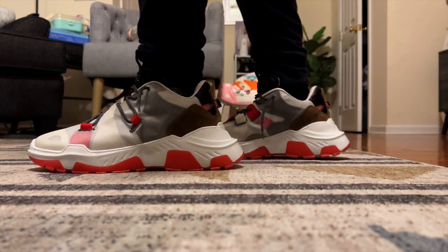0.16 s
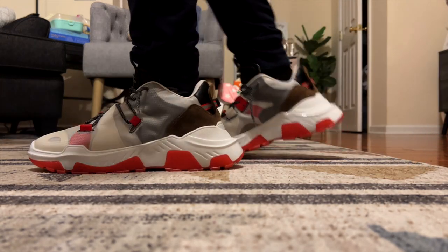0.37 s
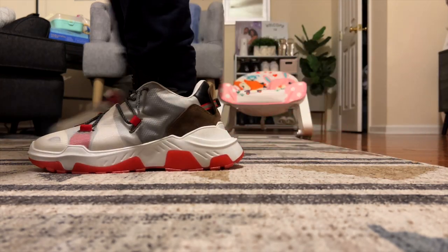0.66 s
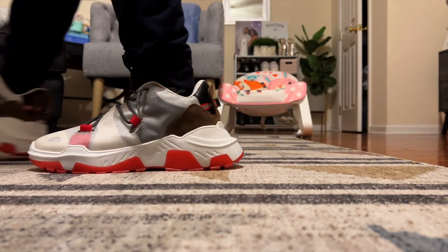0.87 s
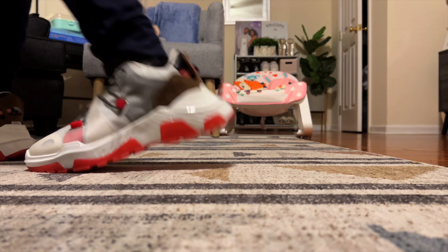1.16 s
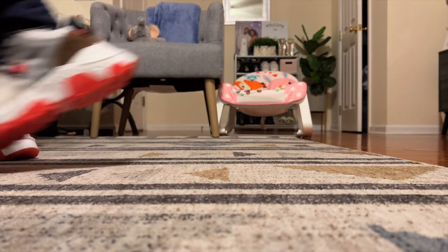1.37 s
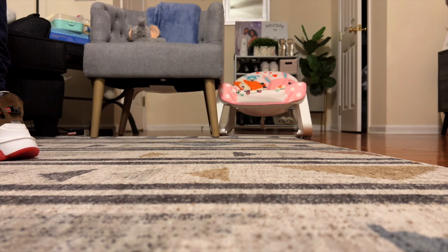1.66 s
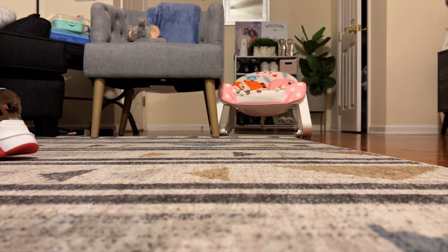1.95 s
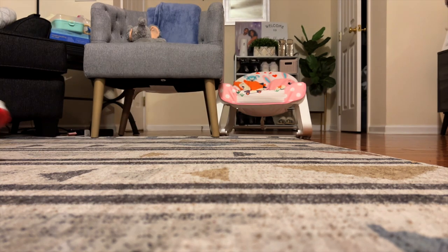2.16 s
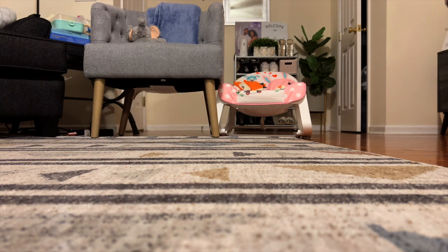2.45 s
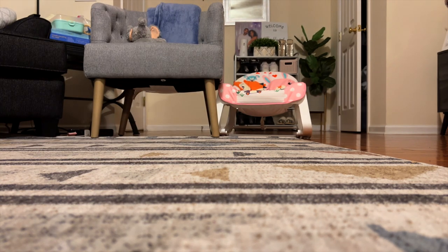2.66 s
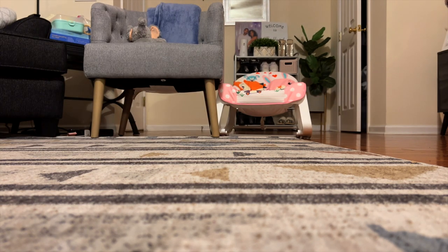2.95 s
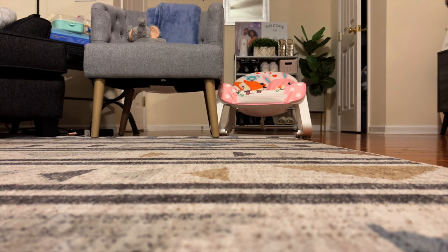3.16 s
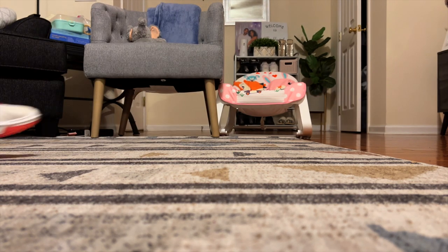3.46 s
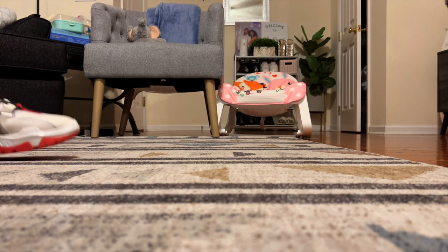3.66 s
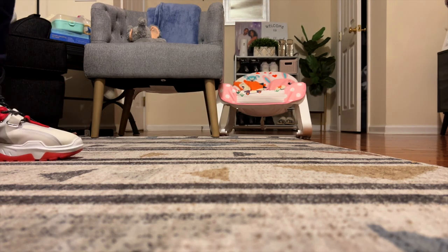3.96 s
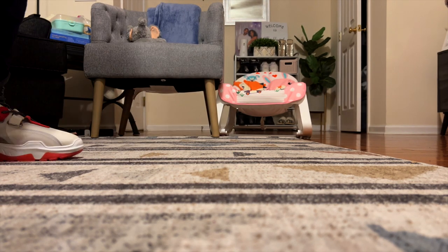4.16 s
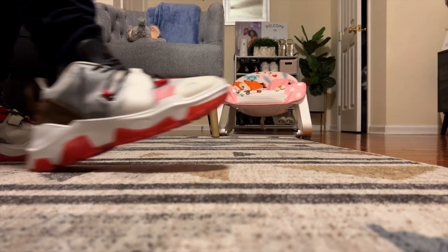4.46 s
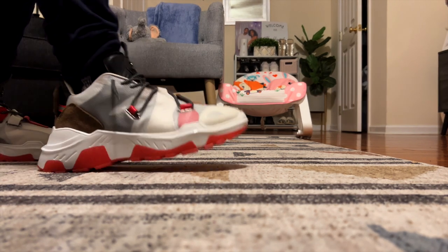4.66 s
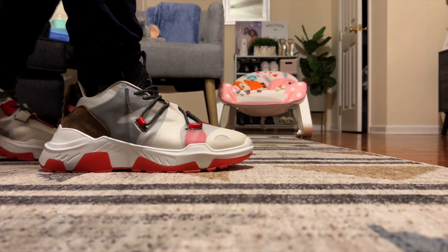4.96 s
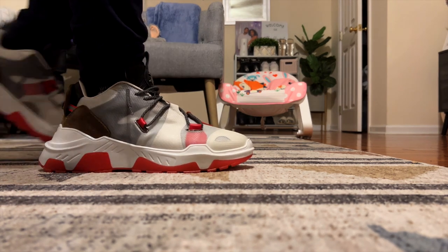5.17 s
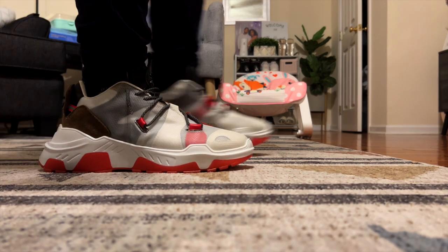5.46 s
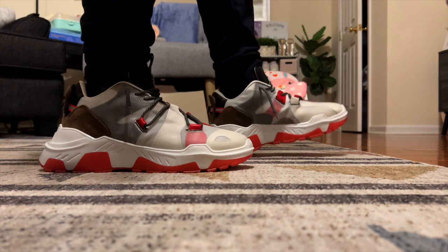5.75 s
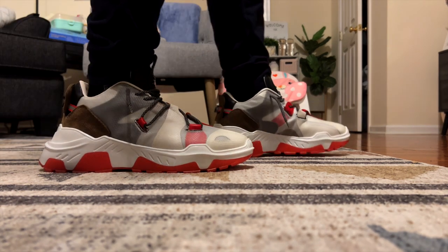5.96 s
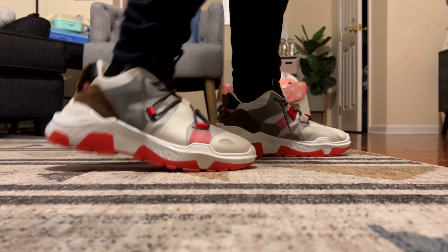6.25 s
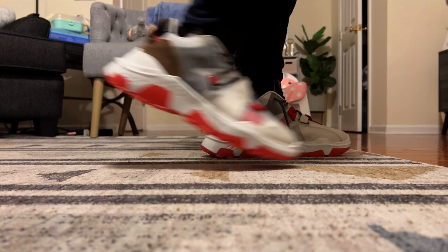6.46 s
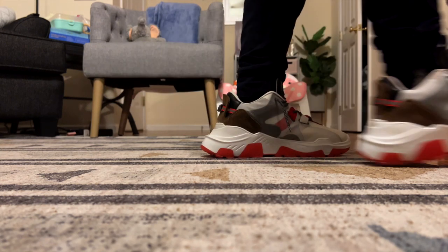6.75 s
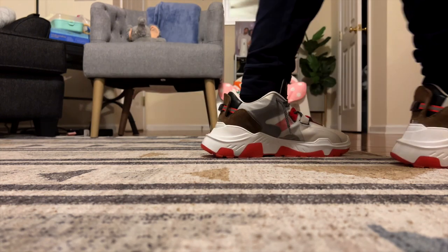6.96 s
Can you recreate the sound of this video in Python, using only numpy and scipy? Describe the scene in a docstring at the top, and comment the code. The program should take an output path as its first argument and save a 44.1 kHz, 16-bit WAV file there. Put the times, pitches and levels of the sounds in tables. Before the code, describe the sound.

Heavy sneakers step across a rug on a wooden floor, close to a low stereo microphone. Each bassy thud has a brief knock and a short floor and room ring. Steps sit mostly on the left, pause after the turn while a shoe creaks faintly, then resume and finally cross to the right. Very quiet fabric brushing, rubber scuffs and a soft low room tone fill the gaps.

```python
"""Sneakers past a floor microphone

Indoors, close: thick soles cross a rug on a wooden floor, pass a microphone at floor height, turn and come back.
Each heel and sole sends a bending wave through the boards: its highs arrive first, so the thud sweeps down.
The floor and the living room ring on. Trousers swish and soles scuff in grainy swells of noise;
the shoes creak in tiny resonant bursts, a thin hiss passes, and the room gives a low rush of air and a faint hum."""
import sys
import numpy as np
from scipy import signal
from scipy.fft import rfft, irfft
from scipy.io import wavfile
from scipy.ndimage import uniform_filter1d

SR = 44100
rng = np.random.default_rng(int(sys.argv[2]) if len(sys.argv) > 2 else 0)


def output_pcm(signal):
    """Save a mono or channel-first signal as 16-bit PCM at the path in sys.argv[1].

    Samples are clipped to [-1, 1] before scaling.
    """
    pcm = np.clip(np.atleast_2d(signal).T, -1, 1) * 32767
    wavfile.write(sys.argv[1], SR, np.round(pcm).astype(np.int16))


N = 313330
SIZE = 32768  # samples in each short sound and response
HZ = np.maximum(np.fft.rfftfreq(SIZE, 1 / SR), 1)
TIME = np.arange(N) / SR
SHORT_TIME = np.arange(SIZE) / SR

# Heel strikes and sole slaps: start_s [s], level_db [dB], contact_hz [Hz], rubber_ring_db [dB]
STRIKES = [(0.948, -16.5, 4400, 8), (1.003, -12.5, 4000, -0.5), (1.9935, -38.5, 5200, 4.5),
           (2.028, -11, 4200, 5.5), (2.6584, -49.5, 2380, 10.5), (2.987, -17, 850, 2),
           (3.657, -13, 3730, 0), (3.697, -17.5, 1410, 6.5), (3.718, -17, 815, -2.5),
           (3.818, -25, 339, 4.5), (6.036, -20.5, 1400, 1.5), (6.077, -15, 1450, 3),
           (6.9925, -16, 1750, 10)]
# Weight rolling onto a foot as the floor gives: start_s [s], level_db [dB], contact_hz [Hz]
TREADS = [(0.001, -27, 52.5), (0.267, -25, 462), (1.266, -26, 304), (1.925, -21.5, 70), (2.66, -26.5, 700),
          (2.693, -30.5, 520), (2.718, -26, 230), (2.756, -25, 115), (3.887, -43.5, 250), (4.48, -40, 500),
          (6.871, -23, 800), (7.014, -17, 59)]
# Relative response of the boards under a hard heel: pitch_hz [Hz], level_db [dB]
BOARDS = [(22, -54.5), (45, -13.5), (70, 0), (100, -4.5), (145, 0), (250, -7.5), (380, -11.5), (480, -10),
          (950, -16), (1300, -19.5), (1650, -29), (2100, -29), (3000, -42.5), (4900, -47), (5700, -60)]
# How much more a step at near left gives the left channel: pitch_hz [Hz], left_minus_right_db [dB]
LEFT_RIGHT_SHADOW = [(50, 2), (140, 2.5), (200, 8.5), (260, 4), (500, 5.5), (700, 17.5), (950, 4),
                     (1300, 9), (1700, 8), (2300, 11), (5500, 5), (9000, -4)]
# Bending waves thrown back by joists and walls: delay_s [s], level_db [dB]
RETURNS = [(0.0205, -14), (.038, -14.5)]
# Slow modes of the whole floor: pitch_hz [Hz], level_db [dB], t60_s [s]
FLOOR_MODES = [(51, -37, .38), (63.2, -19, 0.26), (103.7, -30, .33), (152, -23.5, 0.055), (179, -31, .26)]
# Room reverberation against the direct sound: pitch_hz [Hz], energy_db [dB]
ROOM_DB = [(60, -6), (150, -10), (300, -4), (550, -11), (1000, -10.5), (1600, -15), (2200, -18.5),
           (4000, -7.5), (10000, -9.5)]
# Room decay: pitch_hz [Hz], t60_s [s]
ROOM_T60 = [(60, 0.41), (250, 0.35), (1000, 0.45), (3000, .36), (10000, 0.29)]
# Left-right likeness of diffuse sound: pitch_hz [Hz], likeness [0 to 1]
LIKENESS = [(50, 0.85), (150, 0.94), (300, 0.36), (600, 0.12), (1200, 0.023), (3000, .05), (8000, 0.15),
            (13000, 0.3)]
# Trouser legs swinging past each other: peak_s [s], level_db [dB], fall_s [s]
SWISHES = [(0.01, -61, 0.23), (0.45, -66, 0.15), (0.921, -56.5, 0.15), (1.259, -58, 0.15),
           (2.949, -61.5, 0.091), (3.219, -66, .16), (4.57, -60, .13), (4.92, -61, 0.17),
           (5.391, -64.5, 0.072), (6.13, -59.5, 0.25)]
# Soles scuffing the rug as they land or push off:
# peak_s [s], level_db [dB], fall_s [s], brightness [dB per octave], rasp_db [dB]
SCUFFS = [(1.682, -50, 0.11, -1.47, 13), (1.965, -57, 0.12, -.5, 3), (2.385, -62.5, 0.029, 1, -1),
          (2.675, -52.5, 0.085, -3.5, -5.5), (4.007, -64, 0.034, 3, 3), (4.484, -57, 0.038, 0.5, 0.5),
          (4.729, -64.5, .26, 0.1, 2), (5.785, -58, 0.036, -1, -6), (6.39, -66, 0.027, 2.5, 1.5),
          (6.834, -58, 0.19, -0.6, -1), (7.022, -51.5, 0.051, -1.5, 2)]
# Relative colour of cloth and rubber brushing: pitch_hz [Hz], level_db [dB]
CLOTH = [(50, 1), (130, 4.5), (300, 3.5), (600, 2), (1200, -4.5), (1650, -12.5), (2200, -14.5), (3300, -31),
         (4400, -29.5), (5500, -33), (8000, -39), (13000, -37.5)]
# Clearest creaks and ticks of the shoes, before panning and room: start_s [s], peak_db [dB], pitch_hz [Hz]
CREAKS = [(1.660, -61, 2400), (2.943, -64.5, 1870), (4.852, -55, 2060), (4.865, -56, 2200),
          (4.9154, -63, 2180), (4.969, -60, 2040), (5.079, -62, 1600), (5.3735, -56.5, 993),
          (5.587, -59.5, 1025), (5.755, -63, 1100), (5.769, -57.5, 1670), (5.7697, -65.5, 6550)]
# Relative colour of the still air: pitch_hz [Hz], density_db [dB per Hz]
AIR = [(20, -14), (38, -1), (52, 2), (90, -4), (150, -5), (210, -1.5), (320, -3), (500, -9), (1000, -19.5),
       (1600, -30.5), (2200, -33), (3200, -36.5), (8000, -38.5), (14000, -48.5)]
# Room hum before the microphone: pitch_hz [Hz], rms_db [dB]
HUM = [(54, -74), (119, -74), (307, -73)]

# Knock above the thud for a full, hard blow. A softer contact knocks less;
# a lighter tap hardly bends the floor and is mostly knock.
KNOCK_DB, FULL_DB, HARD_HZ = -1.18, -9, 4500
KNOCK_DB_PER_OCTAVE, KNOCK_DB_PER_DB = 5, -0.28
TREAD_KNOCK_DB = -25  # almost no knock
RING_HZ = 2040  # ring of the rubber sole

# The feet land left of the microphone until they cross to the right and away (leftness 1 = near left)
CROSSING_S, LEFTNESS_BEFORE, LEFTNESS_AFTER, AWAY_KNOCK_DB = 6.95, 1, -0.44, -5.5

SWISH_RISE_SHARE, SWISH_DB_PER_OCTAVE, SWISH_RASP_DB = 0.32, -1.3, -2  # rise as a share of the fall
SCUFF_RISE_S = 0.026

# A shoe slowly taking the weight crackles with smaller slips at uneven gaps, strongest halfway through
FLEX_START_S, FLEX_LENGTH_S = 4.69, 0.42
SLIP_DB, SLIP_SPREAD_DB, SLIP_HZ, SLIP_FADE_DB = -65.5, 0.5, 2150, 14

AIR_DB = -64  # rms before the microphone
CUTOFF_HZ = 15800


def footsteps(knock_hz=290, contact_slope_db=24, ring_octaves=0.44, notch_hz=1640, notch_db=9,
              uneven_db=4.0, left_lag_s=0.00017):
    """Each blow is softened by sole and rug, sweeps through the boards, comes back and rings in floor and room."""
    out = np.zeros((2, N))
    boards, sweep = causal(at_hz(BOARDS, HZ)), bending()
    boards = boards / np.max(abs(irfft(boards * sweep)))
    echoes = sum(from_db(db) * np.exp(-2j * np.pi * HZ * delay_s) for delay_s, db in RETURNS)
    returns = echoes / (1 + 1j * HZ / 400)  # the echoes come back duller
    modes = floor_modes()
    left_lag = np.exp(-2j * np.pi * HZ * left_lag_s * np.array([[1], [0]]))
    knots_hz = np.geomspace(400, 9000, 36)
    for start_s, level_db, knock_db, contact_hz, ring_db in blows():
        leftness, away_db = (LEFTNESS_BEFORE, 0) if start_s < CROSSING_S else (LEFTNESS_AFTER, AWAY_KNOCK_DB)

        knock = (knock_db + away_db) * HZ ** 3 / (HZ ** 3 + knock_hz ** 3)
        ring = ring_db * bump(HZ, RING_HZ, ring_octaves)
        softness = contact_slope_db / 4 * np.log2(1 + (HZ / contact_hz) ** 4)
        force = from_db(level_db) * causal(knock + ring - np.minimum(softness, 60))

        ears_db = leftness * at_hz(LEFT_RIGHT_SHADOW, HZ) * np.array([[0.5], [-0.5]])
        ears_db = ears_db - 10 * np.log10(np.mean(from_db(ears_db) ** 2, axis=0))  # keep the mean power
        # near paths interfere: one notch for steps on the left, and ripples that change from blow to blow
        draws = rng.standard_normal((2, len(knots_hz)))
        ripples = uneven_db * np.array([np.interp(HZ, knots_hz, row, left=0) for row in draws])
        notch = notch_db * max(leftness, 0) * bump(HZ, notch_hz, 0.22)
        ears = causal(ears_db + ripples - notch) * left_lag

        direct = ears * (1 + returns)
        reverb = room() * from_db([[0.8], [-0.8]])
        wave = (boards * (direct + reverb) + modes * from_db([[1.1], [-1.1]])) * sweep
        add(out, start_s, irfft(force * wave))
    return out


def blows():
    """Every contact with the floor as (start_s, level_db, knock_db, contact_hz, ring_db)."""
    contacts = []
    for start_s, level_db, contact_hz, ring_db in STRIKES:
        hardness_db = KNOCK_DB_PER_OCTAVE * np.log2(contact_hz / HARD_HZ)
        lightness_db = KNOCK_DB_PER_DB * (level_db - FULL_DB)
        contacts.append((start_s, level_db, KNOCK_DB + hardness_db + lightness_db, contact_hz, ring_db))
    for start_s, level_db, contact_hz in TREADS:
        contacts.append((start_s, level_db, TREAD_KNOCK_DB, contact_hz, 0))
    return contacts


def bending(lag_s=0.0117, knee_hz=175, steepness=1.7):
    """Bending waves travel more slowly the lower they are, so the bass arrives last."""
    delay_s = lag_s / (1 + (HZ / knee_hz) ** steepness)
    return np.exp(-2j * np.pi * np.cumsum(delay_s) * SR / SIZE)  # delay summed over frequency is phase


def floor_modes():
    """The whole floor rings in a few low, decaying sine modes; returns their spectrum."""
    ringing = 0
    for pitch_hz, level_db, t60_s in FLOOR_MODES:
        decay = from_db(level_db - 60 * SHORT_TIME / t60_s)
        ringing = ringing + decay * np.sin(2 * np.pi * pitch_hz * SHORT_TIME)
    return rfft(ringing)


def room():
    """Response of the living room from one spot: octave bands of noise that build up and die away."""
    noise, out = rfft(diffuse(SIZE)), 0
    build_up = 1 - np.exp(-(SHORT_TIME / 0.0038) ** 2)
    decay = from_db(-60 * SHORT_TIME / np.array([[1.0]]))  # replaced per band below
    for centre_hz in np.geomspace(50, 12800, 9):
        band = np.cos(np.pi / 2 * np.clip(np.log2(HZ / centre_hz), -1, 1)) ** 2
        decay = from_db(-60 * SHORT_TIME / at_hz(ROOM_T60, centre_hz))
        tail = rfft(irfft(noise * band) * decay * build_up)
        tail_energy = np.mean(np.sum(abs(tail) ** 2, axis=1))
        out = out + tail * np.sqrt(np.sum(band ** 2) / tail_energy)
    return out * from_db(at_hz(ROOM_DB, HZ))


def swishes(grain_db=2.0, left_db=2.0, rasp_hz=2900, rasp_octaves=0.62):
    """Cloth and rubber brush in soft, grainy swells of noise; a hard rub adds a rasp."""
    out = np.zeros((2, N))
    for peak_s, level_db, rise_s, fall_s, tilt_db, rasp_db in brushes():
        start_s = max(peak_s - 3 * rise_s, 0)
        age = SHORT_TIME + start_s - peak_s
        swell = np.exp(np.where(age < 0, -(age / rise_s) ** 2, -abs(age) / fall_s))
        grain = rms_one(uniform_filter1d(rng.standard_normal(SIZE), size=160))
        fibres = from_db(grain_db * grain)

        def colour(hz):
            """Cloth colour with this rub's brightness and rasp."""
            tilt = tilt_db * np.log2(np.maximum(hz, 100) / 1000)
            return at_hz(CLOTH, hz) + tilt + rasp_db * bump(hz, rasp_hz, rasp_octaves)

        add(out, start_s, from_db(level_db) * swell * fibres * diffuse(SIZE, colour))
    return out * from_db([[left_db], [-left_db]])


def brushes():
    """Every swish and scuff as (peak_s, level_db, rise_s, fall_s, brightness in dB per octave, rasp_db)."""
    legs = [(peak_s, level_db, SWISH_RISE_SHARE * fall_s, fall_s, SWISH_DB_PER_OCTAVE, SWISH_RASP_DB)
            for peak_s, level_db, fall_s in SWISHES]
    soles = [(peak_s, level_db, SCUFF_RISE_S, fall_s, tilt_db, rasp_db)
             for peak_s, level_db, fall_s, tilt_db, rasp_db in SCUFFS]
    return legs + soles


def creaks(left_db=4, room_db=-1, sole_hz=850, sole_db=-6, sole_octaves=0.53):
    """Each slip is a tiny burst through a broad resonance of the upper and another of the sole."""
    out = np.zeros((2, N))
    walls = from_db(room_db) * room()
    for start_s, peak_db, pitch_hz in CREAKS + slips():
        burst = rfft(rng.standard_normal(SIZE) * np.exp(-SHORT_TIME / 0.002))
        upper = bump(HZ, pitch_hz, 0.38) + 0.12 * bump(HZ, pitch_hz, 1.1)
        body = upper + from_db(sole_db) * bump(HZ, sole_hz, sole_octaves)
        slip = irfft(burst * causal(20 * np.log10(body + 0.00089)))
        slip = from_db(peak_db) * slip / np.max(abs(slip))
        direct = slip * from_db([[left_db], [-left_db]])
        add(out, start_s, direct + irfft(rfft(slip) * walls))
    return out


def slips(count=18):
    """The small slips of a flexing shoe as (start_s, peak_db, pitch_hz)."""
    progress = (np.arange(count) + rng.random(count)) / count
    peak_db = SLIP_DB - SLIP_FADE_DB * (2 * progress - 1) ** 2 + SLIP_SPREAD_DB * rng.standard_normal(count)
    return [(FLEX_START_S + FLEX_LENGTH_S * p, db, SLIP_HZ) for p, db in zip(progress, peak_db)]


def thin_hiss(level_db=-68, left_db=2):
    """A very high hiss swells and fades as the weight settles on one shoe."""
    swell = np.exp(-((TIME - 6.16) / 0.058) ** 2)
    treble = [(6000, -33.5), (9000, -17.5), (12000, -13.5), (14000, -13), (15200, -6.5)]  # pitch_hz, level_db
    hiss = diffuse(N, lambda hz: at_hz(treble, hz))
    return from_db(level_db) * hiss * swell * from_db([[left_db], [-left_db]])


def still_room(waver=0.35):
    """Low, steady rush of air as coloured noise, with hum tones whose phase wanders."""
    knots_s = np.linspace(0, TIME[-1], 40)
    out = diffuse(N, lambda hz: at_hz(AIR, hz)) * from_db(AIR_DB)
    for pitch_hz, rms_db in HUM:
        wander = np.cumsum(rng.normal(0, np.pi * waver, len(knots_s)))
        phase = np.interp(TIME, knots_s, wander)
        out = out + from_db(rms_db) * np.sqrt(2) * np.sin(2 * np.pi * pitch_hz * TIME + phase)
    return out


def diffuse(size, colour=lambda hz: 0 * hz):
    """Coloured stereo noise, alike in the bass and mostly unrelated in the treble; rms 1."""
    hz = np.fft.rfftfreq(size, 1 / SR)
    alike = np.clip(at_hz(LIKENESS, hz), 0, 0.995)
    mid, side = rfft(rng.standard_normal((2, size)))
    stereo = np.sqrt(1 + alike) * mid + np.sqrt(1 - alike) * side * [[1], [-1]]
    return rms_one(irfft(stereo * from_db(colour(hz)), size))


def causal(db):
    """Minimum-phase response with these levels on HZ: nothing sounds before its cause."""
    cepstrum = irfft(np.log(from_db(db)))
    cepstrum[..., 1:SIZE // 2] *= 2
    cepstrum[..., SIZE // 2 + 1:] = 0
    return np.exp(rfft(cepstrum))


def bump(hz, centre_hz, octaves):
    """A bell of height 1 on a log-frequency axis."""
    return np.exp(-(np.log2(np.maximum(hz, 1) / centre_hz) / octaves) ** 2)


def at_hz(points, hz):
    """Read a table on a log-frequency axis."""
    table_hz, values = np.array(points).T
    return np.interp(np.log(np.maximum(hz, 1)), np.log(table_hz), values)


def from_db(db):
    """Decibels to gain."""
    return 10 ** (np.asarray(db) / 20)


def rms_one(x):
    """Scale to unit rms."""
    return x / np.sqrt(np.mean(x ** 2) + 1e-20)


def add(out, start_s, sound):
    """Mix a stereo sound in at start_s, with its far end faded out."""
    start = max(round(start_s * SR), 0)
    faded = sound * np.clip(np.linspace(5, -0.5, sound.shape[1]), 0, 1)
    out[:, start:start + sound.shape[1]] += faded[:, :N - start]


def scene():
    """The walker in the room."""
    return footsteps() + swishes() + creaks() + thin_hiss() + still_room()


def record(dry, low_cut_hz=40):
    """The small microphone drops the deepest bass; the top is cut steeply."""
    low_cut = signal.butter(4, low_cut_hz, "high", fs=SR, output="sos")
    top_cut = signal.ellip(10, 0.1, 80, CUTOFF_HZ, fs=SR, output="sos")
    return signal.sosfilt(top_cut, signal.sosfilt(low_cut, dry))


dry = scene()
out = record(dry)
output_pcm(out)
```